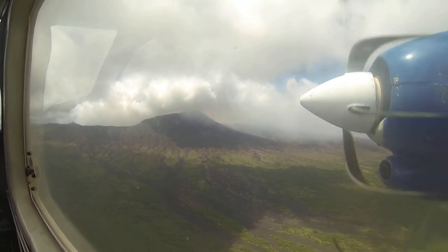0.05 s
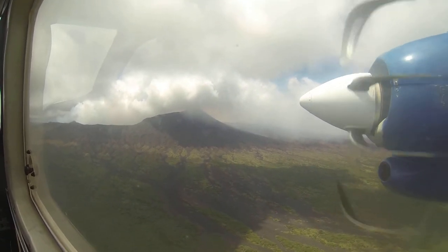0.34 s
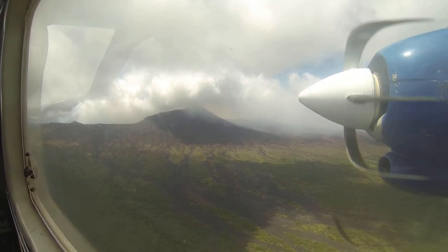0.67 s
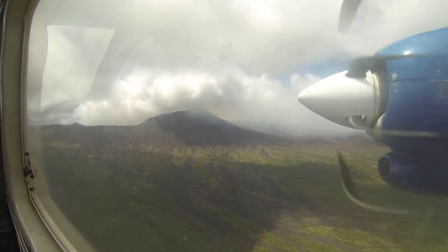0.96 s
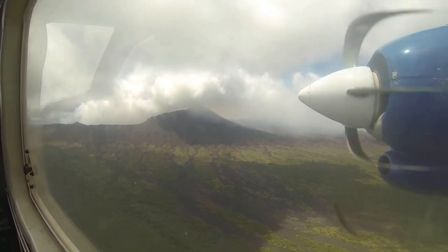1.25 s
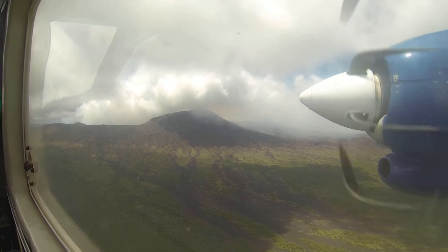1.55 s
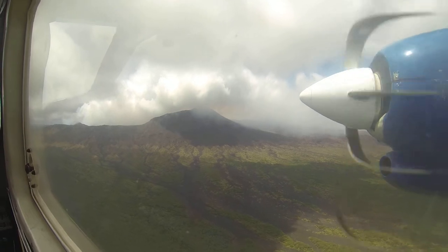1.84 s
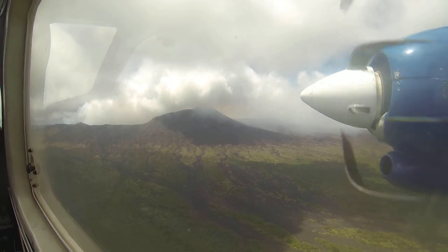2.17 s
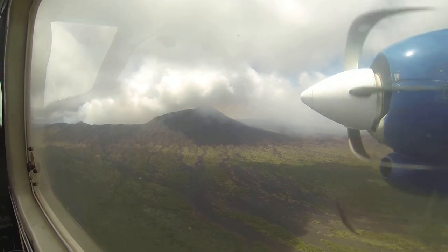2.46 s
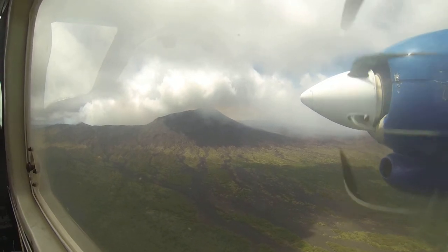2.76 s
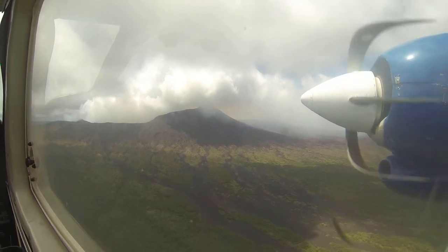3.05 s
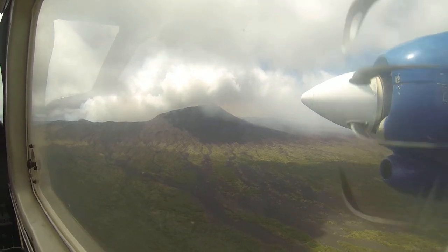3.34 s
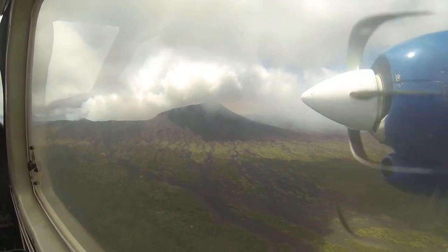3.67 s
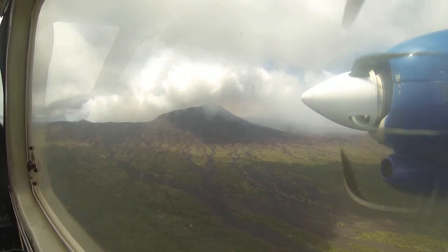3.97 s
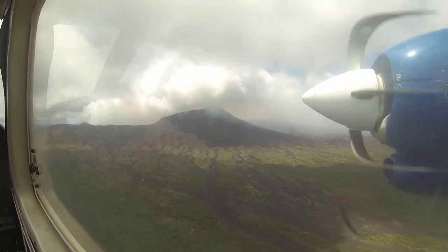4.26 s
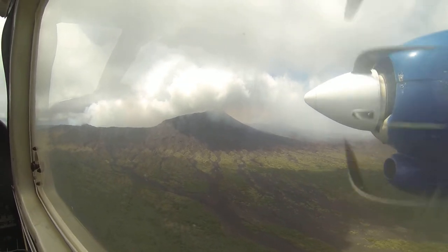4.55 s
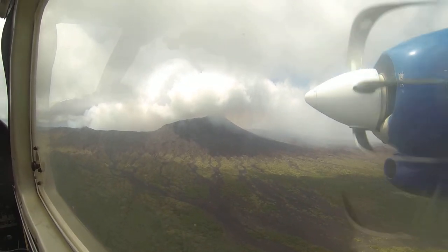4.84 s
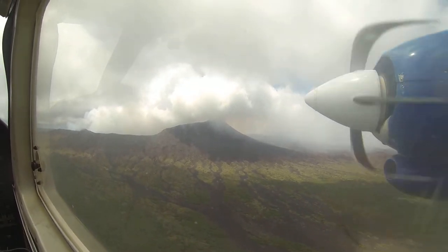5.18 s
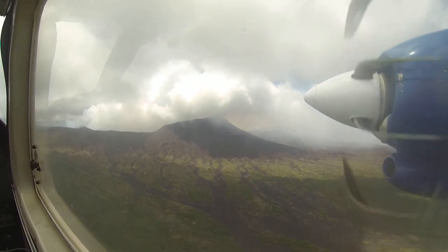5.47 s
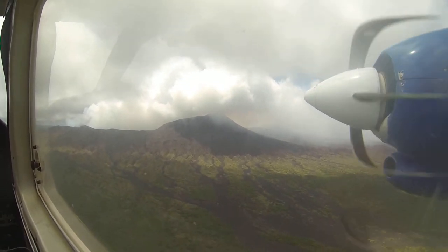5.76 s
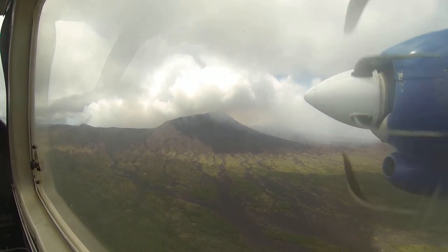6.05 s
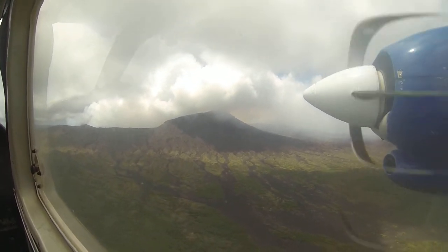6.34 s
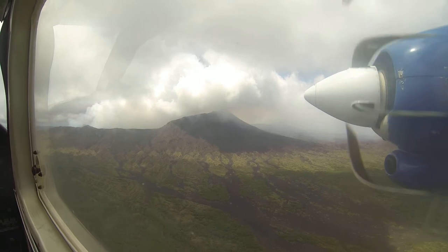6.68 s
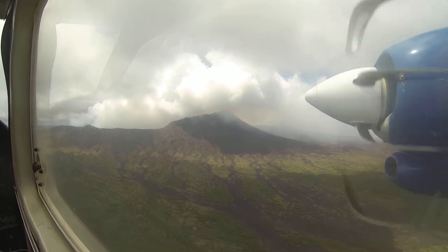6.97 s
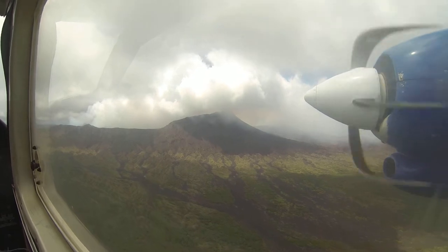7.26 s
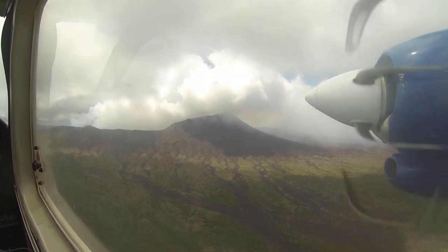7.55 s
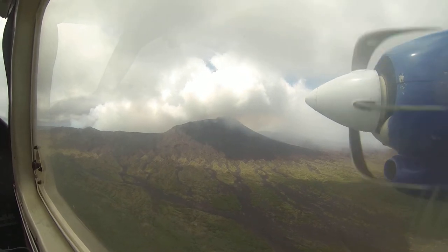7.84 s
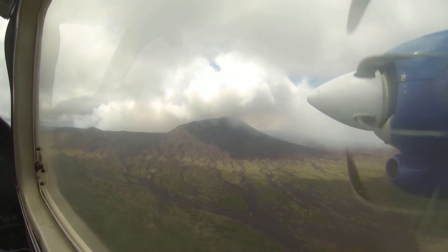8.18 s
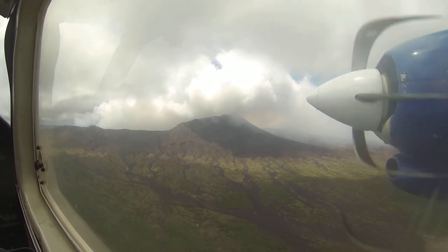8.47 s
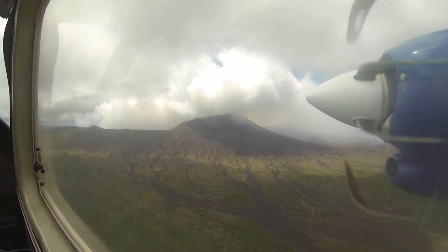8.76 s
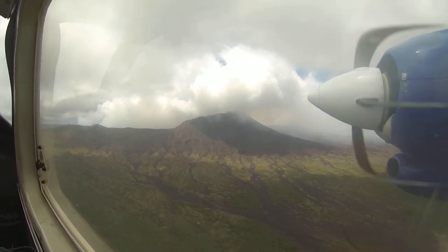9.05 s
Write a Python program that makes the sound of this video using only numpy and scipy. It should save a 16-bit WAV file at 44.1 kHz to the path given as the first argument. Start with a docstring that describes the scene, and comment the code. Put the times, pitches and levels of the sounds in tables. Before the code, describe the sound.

From start to finish, two propeller engines drone at steady cruising speed, heard from a window seat inside a small aircraft cabin. The sound is a loud, deep hum with an engine throb underneath, and its pitch barely moves. The two propellers run slightly out of step, so the hum slowly pulses and shifts in tone, swelling around 0.7, 3, 4.5, 6 and 8.3 seconds and easing in between. A constant low roar of air along the hull lies behind it, rising slightly whenever the hum dips. Higher up there is a soft hiss of air along the window and a very faint, thin machinery whine. Between about 1.9 and 2.6 seconds, four tiny bright ticks are barely audible over the drone. The engines and airflow continue unchanged in character to the end, at about 9 seconds.

```python
"""Twin-propeller cabin in cruise

Two propellers turn at almost the same speed, so their harmonics slowly beat against each other.
Engines throb underneath, slipstream roars along the hull and machinery whines.
Faint bright ticks sit on the drone's loudest peaks.
The camera's gain control lifts the roar whenever the drone cancels."""
import sys
import numpy as np
from scipy import signal
from scipy.fft import rfft, irfft, next_fast_len
from scipy.io import wavfile
from scipy.ndimage import uniform_filter1d, map_coordinates

SR = 44100
rng = np.random.default_rng(int(sys.argv[2]) if len(sys.argv) > 2 else 0)


def persist_wave(psi):
    """Save psi, clipped to +-1, as 16-bit WAV."""
    counts = np.round(np.clip(psi, -1, 1) * 32767).astype(np.int16)
    wavfile.write(sys.argv[1], SR, np.atleast_2d(counts).T)


N = 406161


def amp(db):
    """Decibels to gain."""
    return 10 ** (np.asarray(db) / 20)


def unit_rms(x):
    """Scaled to rms 1."""
    return x / np.sqrt(np.mean(x ** 2) + 1e-20)


def eq_curve(points, hz):
    """(Hz, dB) points joined on a log frequency axis."""
    point_hz, point_db = np.transpose(points)
    return np.interp(np.log(hz + 1), np.log(point_hz + 1), point_db)


def wobble(rate, step=100):
    """A smooth random curve, rate knots a second."""
    coarse = np.arange(0, N + step, step)
    knots = rng.standard_normal(int(N * rate / SR) + 4)
    return np.interp(np.arange(N), coarse, map_coordinates(knots, [coarse * rate / SR]))


def filtered(x, response):
    """x through an EQ whose gain is response(Hz)."""
    size = next_fast_len(N + SR // 2)
    return irfft(rfft(x, size) * response(np.fft.rfftfreq(size, 1 / SR)), size)[:N]


def noise(colour):
    """Noise of rms 1, shaped by colour(Hz) in dB."""
    return unit_rms(filtered(rng.standard_normal(N), lambda hz: amp(colour(hz))))


def resonance(hz, centre, width):
    """A bell curve of height 1, width Hz wide at half height."""
    return 1 / (1 + (2 * (hz - centre) / width) ** 2)


# Faint machinery whines. Each row: centre in Hz, width in Hz, level in dB.
WHINES = [(3600, 82, -68), (5150, 300, -71)]

def machinery_whine():
    """Each whine is a narrow, restless band of noise."""
    return sum(amp(db) * noise(lambda hz: 20 * np.log10(resonance(hz, centre, width)))
               for centre, width, db in WHINES)


# Faint bright ticks at fixed times. Each row: start in seconds, relative level in dB.
TICKS = [(1.915, -39.5), (2.071, -37), (2.306, -41.5), (2.5944, -44)]

def ticks(band_hz=(2300, 5500), t60_s=.012, gain_db=-4.5):
    """Faint bright ticks: each a burst of noise that dies at once."""
    t = np.arange(N) / SR
    envelope = sum(amp(db - 60 * np.abs(t - start) / t60_s) * (t >= start) for start, db in TICKS)
    band = signal.butter(2, band_hz, "bandpass", fs=SR, output="sos")
    bright_noise = unit_rms(signal.sosfilt(band, rng.standard_normal(N)))
    return amp(gain_db) * envelope * bright_noise


# Slipstream and engine roar through the hull. Each row: frequency in Hz, relative level in dB.
ROAR_EQ = [(10, -25), (24, 2.5), (70, 1.5), (210, 2), (295, -5), (370, -10.5), (450, -10), (545, -5),
           (598, -20.5), (650, -13.5), (755, -10.5), (850, -34), (1200, -65.5)]
# Air hissing along the window. Each row: frequency in Hz, relative level in dB.
HISS_EQ = [(400, -21.5), (850, -5), (1100, 0), (1650, 0), (2000, -6.5), (2250, -8), (2650, -15),
           (3600, -15.5), (4300, -26), (5900, -31), (8200, -36.5), (10500, -42.5), (13000, -54)]
# Window resonances that colour the hiss. Each row: centre in Hz, width in Hz, boost in dB.
PANE_RESONANCES = [(3760, 86, 1.5), (5110, 730, 9), (6700, 950, 9)]

def slipstream(near, roar_db=-23.0, hiss_db=-42.5, chop=.04, gust_db=0.57):
    """Steady roar and hiss, lightly chopped by the wash of the near blades."""
    def pane_db(hz):
        return sum(db * resonance(hz, centre, width) for centre, width, db in PANE_RESONANCES)

    roar = amp(roar_db + gust_db * wobble(8)) * noise(lambda hz: eq_curve(ROAR_EQ, hz))
    hiss = amp(hiss_db + 0.14 * wobble(16)) * noise(lambda hz: eq_curve(HISS_EQ, hz) + pane_db(hz))
    return (roar + hiss) * (1 + chop * np.cos(near))


def partial(phase, order, db, waver_db=0.7, jitter_rad=0.02, bass_lead_cycles=.45):
    """One tone at order times the blade rate; turbulence shakes its level and timing."""
    strength = np.sqrt(2) * amp(db + waver_db * wobble(7.6))
    shaken_phase = phase + jitter_rad * wobble(9.9)
    # hull and microphone are dispersive: the lower the tone, the further it runs ahead
    lead = 2 * np.pi * bass_lead_cycles / order
    return -strength * np.cos(order * shaken_phase + lead)


# Pitches of the engine tones, as multiples of the blade rate.
ENGINE_ORDERS = (.25, .75, 1.5, 2.25)
# The same tones in the mix. Each row: far engine level in dB, near engine level in dB.
ENGINE_LEVELS = [(-52, -46.5), (-51, -43), (-43, -32), (-49, -41.5)]

def engines(far, near, waver_db=3.5):
    """Exhaust firing and uneven cylinders, locked to the propeller shafts."""
    out = np.zeros(N)
    for order, (far_db, near_db) in zip(ENGINE_ORDERS, ENGINE_LEVELS):
        out += partial(far, order, far_db, waver_db) + partial(near, order, near_db, waver_db)
    return out


# Cruise speed, held by the governor. Each row: time in seconds, near blades passing per second.
BLADE_RATE = [(0.0, 76.61), (1.0, 76.95), (3.8, 76.44), (4.5, 77.13), (5.2, 76.81), (6.6, 76.88),
              (7.0, 77.15), (7.8, 76.7), (9.2, 76.49)]
# The far propeller runs a touch faster. Each row: time in seconds, its lead in blades (whole = in step).
FAR_SLIP = [(0.0, -0.46), (0.35, -0.35), (1.7, 0.05), (2.65, 0.15), (3.49, 0.36), (4.17, 0.7), (4.83, 0.82),
            (5.47, 1.07), (6.64, 1.39), (7.75, 1.57), (9.2, 2.03)]

def blade_phases(inertia_s=0.31):
    """Far and near propeller phase, one cycle per passing blade; their slip makes the beat."""
    t = np.arange(N) / SR
    near_cycles = np.cumsum(np.interp(t, *np.transpose(BLADE_RATE))) / SR
    slip = np.interp(t, *np.transpose(FAR_SLIP))
    eased_slip = uniform_filter1d(slip, int(inertia_s * SR), mode="nearest")
    return 2 * np.pi * (near_cycles + eased_slip), 2 * np.pi * near_cycles


# The drone at the seat, from the fundamental up. Each row: far level in dB, near level in dB.
BLADE_HARMONICS = [(-22.5, -23.5), (-14.5, -15), (-23.5, -21), (-44, -26), (-48, -44), (-48, -55),
                   (-45, -40.5), (-58.5, -58.5), (-61, -57)]

def propellers(far, near):
    """Each passing blade is a suction pulse; both sets of harmonics add up in the cabin and beat."""
    out = np.zeros(N)
    for order, (far_db, near_db) in enumerate(BLADE_HARMONICS, 1):
        # standing waves in the cabin flip the near propeller's overtones
        polarity = 1 if order == 1 else -1
        out += partial(far, order, far_db) + polarity * partial(near, order, near_db)
    return out


def scene():
    """Drone, slipstream, whine and faint ticks at a window seat."""
    far, near = blade_phases()
    drone = propellers(far, near) + engines(far, near)
    return (drone + slipstream(near) + machinery_whine() + ticks())[None]


def gain_control(x, ceiling_db=-5.0, release_db_per_s=42, attack_s=0.0011, snap=0.076):
    """Each peak over the ceiling ducks the gain, which then climbs smoothly back."""
    headroom_db = ceiling_db - 20 * np.log10(np.abs(x) + 1e-6)
    climb_db = release_db_per_s * np.arange(N) / SR
    cut_db = np.minimum.accumulate(np.minimum(0, headroom_db - climb_db))
    pole = np.exp(-1 / (attack_s * SR))
    eased_db = signal.lfilter([1 - pole], [1, -pole], cut_db)
    # a share of the cut snaps in on the crest of the wave, with a faint tick
    falling = np.diff(cut_db, prepend=0) < 0
    last_steady = np.maximum.accumulate(np.where(falling, 0, np.arange(N)))
    snap_db = snap * (cut_db[last_steady] - eased_db)
    return x * amp(climb_db + eased_db + snap_db)


# The camera's treble roll-off. Each row: frequency in Hz, gain in dB.
TREBLE_EQ = [(10500, 0), (13000, -7.5), (15700, -18)]

def record(dry):
    """The camera rides its gain; its top octave rolls off and nothing passes its band limit."""
    limit_hz = 15700
    levelled = gain_control(dry[0])
    return filtered(levelled, lambda hz: amp(eq_curve(TREBLE_EQ, hz)) * (hz < limit_hz))[None]


dry = scene()
out = record(dry)
persist_wave(out)
```